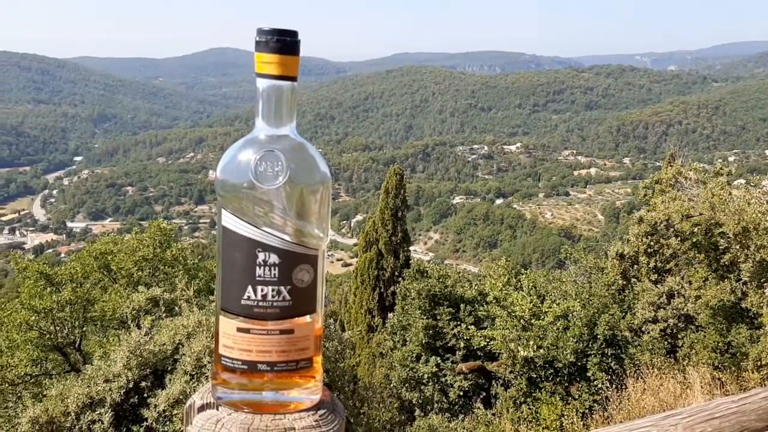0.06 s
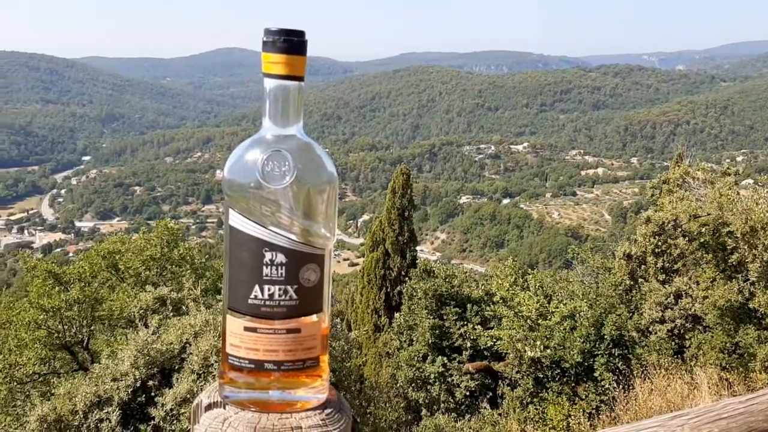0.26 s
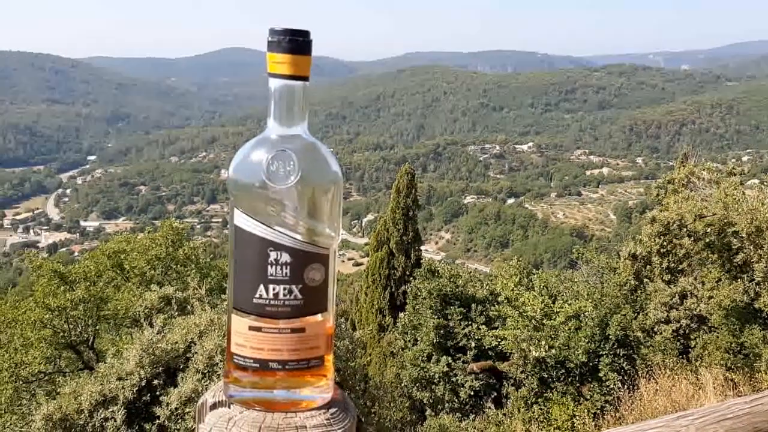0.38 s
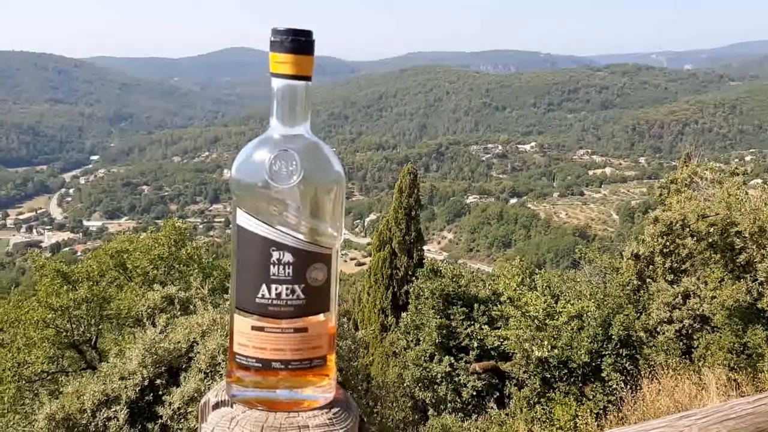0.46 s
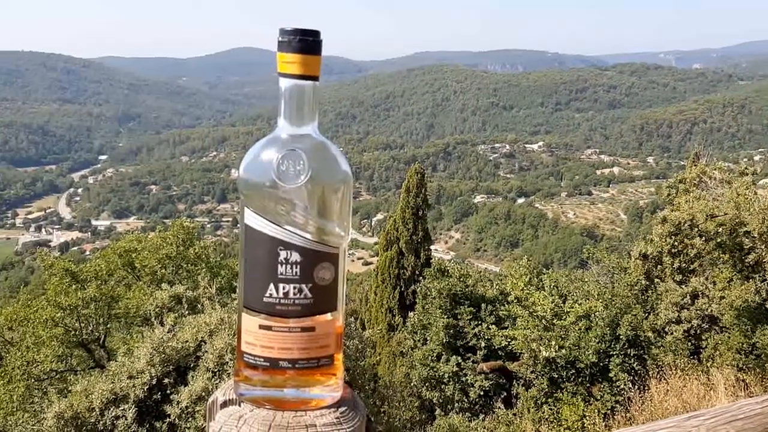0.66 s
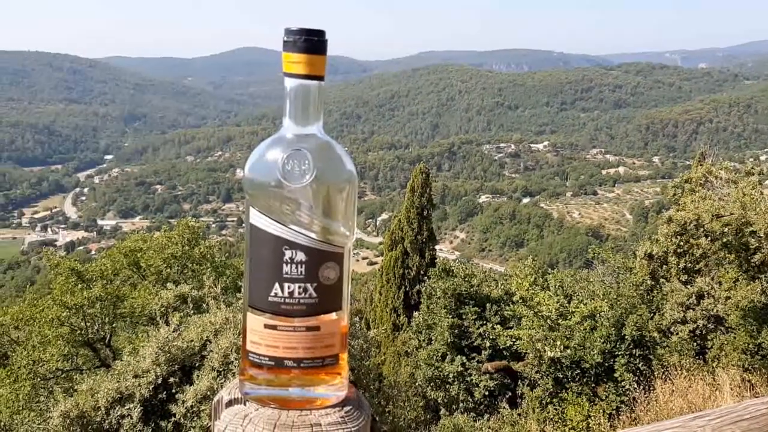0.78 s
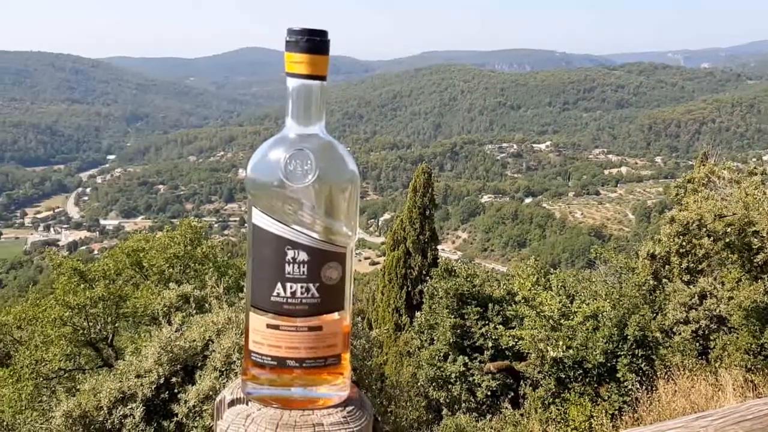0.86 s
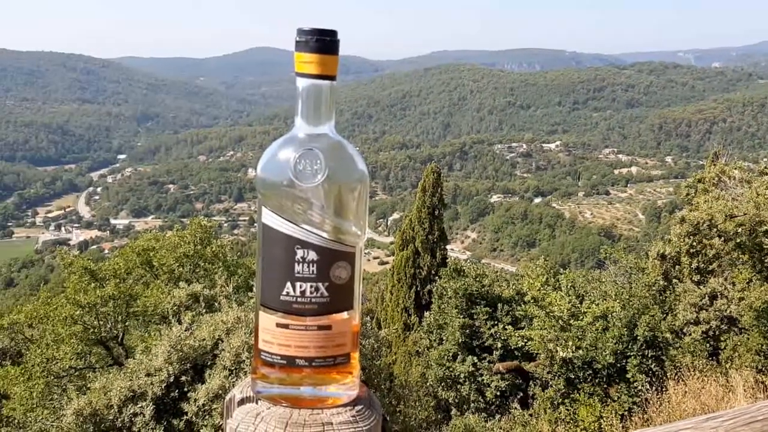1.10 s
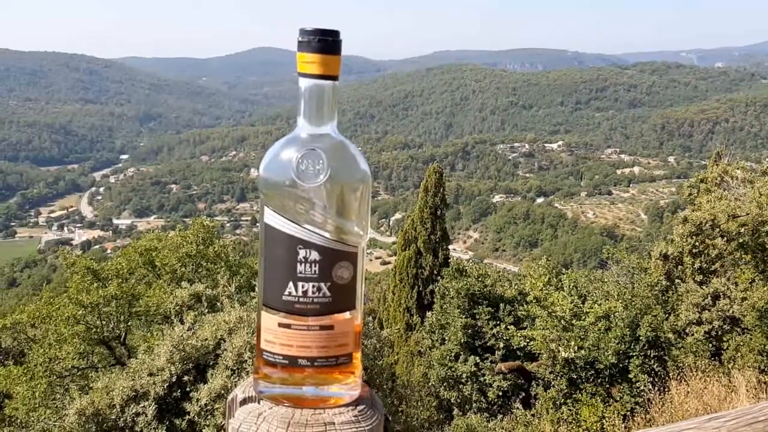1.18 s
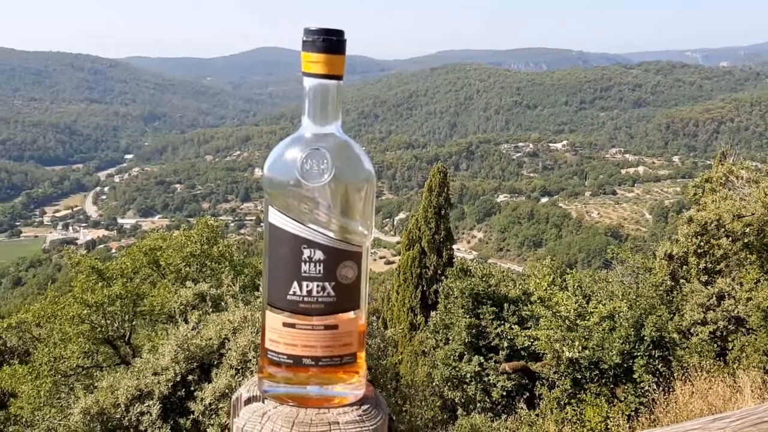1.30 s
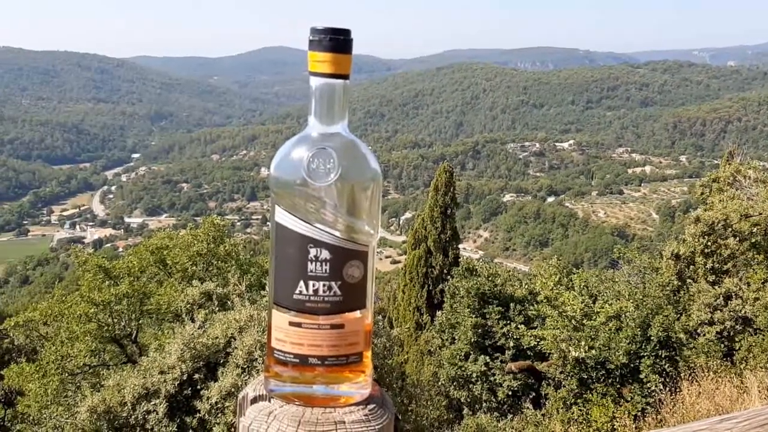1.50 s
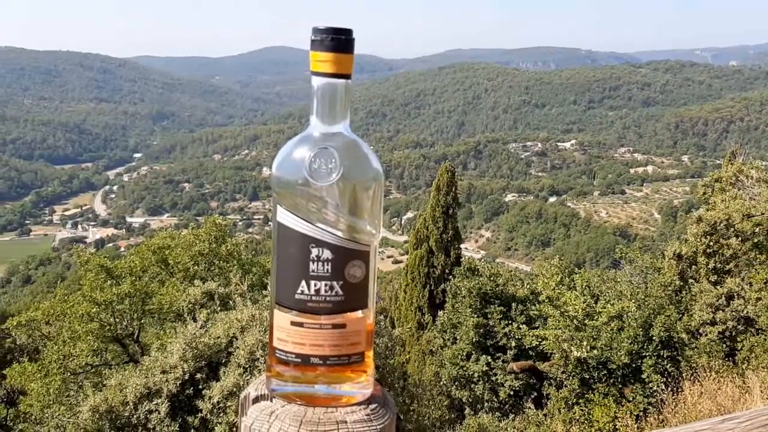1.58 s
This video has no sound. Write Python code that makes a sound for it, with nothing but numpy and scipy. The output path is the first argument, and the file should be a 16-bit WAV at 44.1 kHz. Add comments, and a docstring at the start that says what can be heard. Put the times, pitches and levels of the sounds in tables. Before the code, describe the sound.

On a hillside outdoors, a cicada keeps up a quick, raspy chirping with a faint chorus far behind it. Low gusts of wind buffet the microphone, strongest in the first half, and a few tiny dry ticks come midway.

```python
"""On a hot hillside, a cicada in a tree chirps six times a second. Each chirp is a train of impulses from
buckling tymbal ribs; these excite the resonances of its hollow body, and the foliage scatters the sound.
Behind it lie a faint far chorus, the hush of the valley and a few soft distant tones.
Turbulent gusts rumble, flutter and thump on the microphone; close by, dry ticks sound and grass rustles."""
import sys
import numpy as np
from scipy import signal
from scipy.fft import rfft, irfft
from scipy.io import wavfile
from scipy.ndimage import uniform_filter1d

SR = 44100
rng = np.random.default_rng(int(sys.argv[2]) if len(sys.argv) > 2 else 0)


def unload_wav(signal):
    """Save mono or channel-first audio to the path in sys.argv[1] as 16-bit WAV at rate SR, clipped to [-1, 1]."""
    wavfile.write(
        sys.argv[1],
        SR,
        np.round(np.clip(np.atleast_2d(signal).T, -1, 1) * 32767).astype(np.int16),
    )


N = 72765

# chirps of the cicada: start_s, length_s, relative_db
CHIRPS = [(-.002, 0.087, 2.5), (.164, 0.081, 4.5), (0.3193, 0.096, 6.5), (0.498, 0.083, 5),
          (0.674, 0.075, 6), (0.84, 0.091, 2.5), (1.017, 0.078, 3), (1.187, 0.076, 1.5), (1.3474, 0.084, 2),
          (1.5184, 0.078, 4)]
# resonances of its body: pitch_hz, width_hz, relative_db, extra_swell_db, direct_share_db
BODY_MODES = [(4925, 870, 0.5, 3, -6.5), (5512, 220, -11.5, 10.5, -8), (5865, 160, -11, 6.5, -16.5),
              (7080, 920, -15.5, 8, -9)]
# spectrum of the far chorus: frequency_hz, relative_db
CHORUS_SPECTRUM = [(3800, -13.5), (4400, -3), (4800, 1), (5600, 3), (6300, -4.5), (7400, -8.5), (9000, -38)]
# spectrum of the valley's hush: frequency_hz, relative_db
HUSH_SPECTRUM = [(40, 11.5), (150, -11.5), (300, 3), (600, 0), (1000, 0.5), (1400, 2.5), (1750, -4),
                 (2400, 2.5), (3400, 0.5), (8500, -1.5), (15500, -3)]
# slow swell of the hush: time_s, gain_db
HUSH_SWELL = [(0, 1.5), (.18, 0), (.26, -1), (.42, -0.2), (.64, -0.5), (.765, 2), (.88, -0.5), (1.2, -0.5),
              (1.52, 0), (1.65, -1.5)]
# strength of the wind rumble: time_s, level_db
GUSTS = [(0, -56), (.03, -51), (.096, -55.5), (.132, -37), (.164, -51), (.2, -31), (.27, -28), (.34, -39.5),
         (.39, -34), (.53, -39.5), (.6, -48), (.65, -39), (.69, -33.5), (.76, -33.5), (.83, -38),
         (.86, -56), (.885, -43.5), (.95, -57.5), (1.02, -65), (1.2, -56), (1.26, -46), (1.31, -38),
         (1.46, -48.5), (1.51, -38), (1.58, -56.5), (1.65, -57)]
# spectrum of the large eddies: frequency_hz, relative_db
LARGE_EDDY_SPECTRUM = [(15, -46), (28, -11.5), (43, -0.5), (60, 3), (82, -8), (115, -15.5), (170, -29.5),
                       (260, -40), (500, -63)]
# spectrum of the fine eddies: frequency_hz, relative_db
FINE_EDDY_SPECTRUM = [(70, -8), (120, 7.5), (180, -5), (260, -7), (400, -9.5), (800, -29)]
# far sounds from the valley: centre_s, level_db, half_length_s, pitch_hz, half_width_hz
FAR_TONES = [(.02, -64, 0.025, 984, 90), (.17, -72, 0.32, 1050, 400), (.597, -64.5, .014, 960, 154),
             (1.13, -75, 0.06, 880, 203)]
# flutter of the sharpest gusts: centre_s, level_db, half_length_s, pitch_hz, half_width_hz
FLUTTERS = [(.247, -42.5, 0.0071, 148, 123), (0.681, -46, 0.014, 215, 147), (.74, -45, 0.016, 134, 98),
            (1.41, -55, 0.098, 137, 102)]
# buffets of air on the microphone: centre_s, peak_db, width_s
BUFFETS = [(0.25, -15.5, 0.0032), (0.37, -26, 0.0045), (0.683, -22.5, 0.0015), (0.756, -22, 0.0022),
           (1.301, -35.5, 0.0014), (1.505, -43, 0.009)]
# dry ticks: start_s, peak_db, pitch_hz, width_hz, decay_s
TICKS = [(0.7483, -41, 3600, 9200, 0.00013), (.8026, -42.5, 4090, 640, 0.00039),
         (.8044, -45, 5840, 2600, 0.00016), (.8287, -44, 2100, 2290, 0.0001)]
# rustles of dry grass: centre_s, level_db, half_length_s, pitch_hz, half_width_hz
RUSTLES = [(.762, -61, 0.019, 1650, 1980), (.834, -68.5, 0.033, 2040, 1590)]

CLICK_HZ, JITTER_S, CLICK_SPREAD_DB = 219.3, .00028, 1
FIRST_GAP_S, OPENING_DB = .0063, 1  # a lone, slightly harder click opens each chirp
SWELL_DB, RELEASE_S = 1, .0076  # the chirp grows, then lets go
RIB_LAG_S, RIB_JITTER_S, RIB_DB = .0017, .0004, -8.5  # a second rib buckles after each click
BRANCH_DB, BRANCH_T60_S, LEAVES_DB, LEAVES_T60_S = -14, .04, -7.5, .25


def undb(db):
    """Amplitude grows tenfold for every 20 decibels."""
    return 10 ** (np.asarray(db) / 20)


def unit(x):
    """Normalisation to an rms of 1."""
    return x / np.sqrt(np.mean(x ** 2))


def envelope(points):
    """Gain over time, interpolated in decibels between (time_s, level_db) points."""
    return undb(np.interp(np.arange(N) / SR, *np.array(points).T))


def resonate(x, hz, width_hz):
    """Two like resonators in cascade pass a band with steep skirts."""
    b, a = signal.iirpeak(min(hz, .45 * SR), hz / width_hz, fs=SR)
    return signal.lfilter(b, a, signal.lfilter(b, a, x))


def coloured_noise(spectrum):
    """Spectral shaping of white noise by (frequency_hz, relative_db) points, at an rms of 1."""
    hz, db = np.array(spectrum).T
    f = np.maximum(np.arange(N // 2 + 1) * SR / N, 1)
    gain = undb(np.interp(np.log(f), np.log(hz), db))
    return unit(irfft(rfft(rng.standard_normal(N)) * gain, N))


def noise_swells(rows):
    """Amplitude modulation: each Gaussian band of noise rises and falls once in a bell curve."""
    t, f, out = np.arange(N) / SR, np.arange(N // 2 + 1) * SR / N, 0
    for at, db, half_length, hz, half_width in rows:
        band = irfft(rfft(rng.standard_normal(N)) * np.exp(-((f - hz) / half_width) ** 2), N)
        out = out + undb(db) * np.exp(-((t - at) / half_length) ** 2) * unit(band)
    return out


def tymbal_clicks(count=26):
    """Elastic buckling: each rib gives an impulse. Returns times, sizes and progress through the chirp."""
    clicks = []
    for start, length, db in CHIRPS:
        size_draw, time_draw, rib_time_draw, rib_size_draw = rng.standard_normal((count, 4)).T
        age = np.r_[0, FIRST_GAP_S + np.arange(count - 1) / CLICK_HZ]
        progress = np.minimum(age / length, 1)
        click_db = db + OPENING_DB * (age == 0) + SWELL_DB * progress + CLICK_SPREAD_DB * size_draw
        size = undb(click_db) / (1 + np.exp((age - length) / RELEASE_S))
        at = start + age + JITTER_S * time_draw
        rib_at = at + RIB_LAG_S + RIB_JITTER_S * rib_time_draw
        rib_size = size * undb(RIB_DB + CLICK_SPREAD_DB * rib_size_draw)
        clicks += [[at, size, progress], [rib_at, rib_size, progress]]
    return np.hstack(clicks)


def foliage_scatter(x, t60_s, sway_hz=.47):
    """Multiple scattering: dense, dying reflections drift between two patterns as the foliage sways."""
    t = np.arange(SR // 2) / SR
    clouds = rng.standard_normal((2, len(t))) * np.exp(-np.log(1000) * t / t60_s)
    a, b = (signal.fftconvolve(x, cloud / np.linalg.norm(cloud))[:N] for cloud in clouds)
    sway = 2 * np.pi * sway_hz * np.arange(N) / SR
    return a * np.cos(sway) + b * np.sin(sway)


def cicada(level_db=-56.5, cutoff_hz=4265):
    """Resonance: clicks ring the hollow body, brighter as the chirp swells, heard direct and scattered."""
    at, size, progress = tymbal_clicks()
    inside = (at >= 0) & (at < (N - 1) / SR)
    song, direct = 0, 0
    for hz, width, db, swell_db, direct_db in BODY_MODES:
        push = size * undb(db + swell_db * progress) / np.sqrt(width)
        impulses = np.bincount((at[inside] * SR).astype(int), push[inside], N)
        ring = resonate(impulses, hz, width)
        song = song + ring
        direct = direct + undb(direct_db) * ring
    branches = undb(BRANCH_DB) * foliage_scatter(song, BRANCH_T60_S)
    leaves = undb(LEAVES_DB) * foliage_scatter(song, LEAVES_T60_S)
    # so small a body radiates little below the cutoff
    radiation = signal.butter(12, cutoff_hz, "highpass", fs=SR, output="sos")
    return undb(level_db) * unit(signal.sosfilt(radiation, direct + branches + leaves))


def far_chorus(level_db=-69.5):
    """Incoherent addition: many far cicadas merge into a steady band of noise."""
    return undb(level_db) * coloured_noise(CHORUS_SPECTRUM)


def valley_hush(base_db=-61.5):
    """Broadband noise under slow modulation is heard as a gently swelling hush."""
    return undb(base_db) * envelope(HUSH_SWELL) * coloured_noise(HUSH_SPECTRUM)


def wind_rumble(fine_gain_db=-40.5, fine_exponent=.54):
    """Turbulence: eddies press on the microphone; the fine ones grow more slowly than the gust."""
    gust = envelope(GUSTS)
    large = coloured_noise(LARGE_EDDY_SPECTRUM)
    running_rms = np.sqrt(uniform_filter1d(large ** 2, size=2000))
    fine = undb(fine_gain_db) * coloured_noise(FINE_EDDY_SPECTRUM)
    return large / running_rms * gust + fine * gust ** fine_exponent


def far_tones():
    """Narrowband noise has a vague pitch: soft swells near 1 kHz come from the valley."""
    return noise_swells(FAR_TONES)


def port_flutter():
    """Unsteady flow: the sharpest gusts flutter at the microphone's port."""
    return noise_swells(FLUTTERS)


def wind_buffets(port_hz=51.9, port_width_hz=42):
    """Transient excitation: a two-sided pressure pulse sets off the microphone's low ring, a thump."""
    t, out = np.arange(N) / SR, 0
    for at, db, width in BUFFETS:
        offset = (t - at) / width
        pressure = offset * np.exp(-offset ** 2 / 2)
        thump = resonate(pressure, port_hz, port_width_hz)
        out = out + undb(db) * thump / np.abs(thump).max()
    return out


def dry_ticks():
    """Damped resonance: very short noise bursts make tiny snaps, as of twigs or grass."""
    t, out = np.arange(N) / SR, 0
    for at, db, hz, width, decay in TICKS:
        burst = rng.standard_normal(N) * (t >= at) * np.exp(-np.abs(t - at) / decay)
        snap = resonate(burst, hz, width)
        out = out + undb(db) * snap / np.abs(snap).max()
    return out


def grass_rustle():
    """Friction noise: dry grass rustles briefly in a gust."""
    return noise_swells(RUSTLES)


def scene():
    """Superposition: the sounds of the hillside add at one microphone."""
    hillside = cicada() + far_chorus() + valley_hush() + wind_rumble() + far_tones()
    close_by = port_flutter() + wind_buffets() + dry_ticks() + grass_rustle()
    return (hillside + close_by)[None]


def record(dry, cutoff_hz=15800):
    """Band limiting: the recorder's steep low-pass filter removes the highest treble."""
    return signal.sosfilt(signal.ellip(10, .2, 70, cutoff_hz, fs=SR, output="sos"), dry)


dry = scene()
out = record(dry)
unload_wav(out)
```